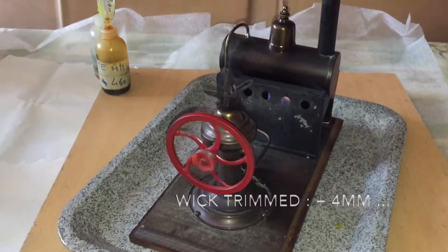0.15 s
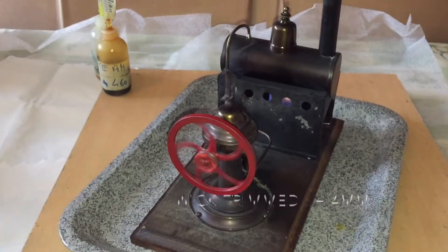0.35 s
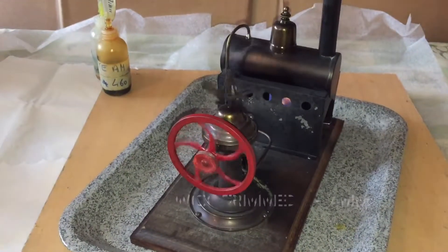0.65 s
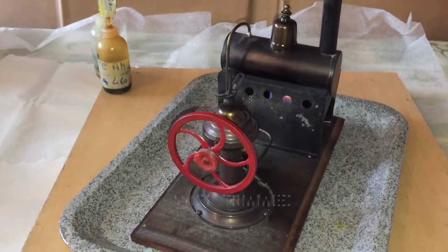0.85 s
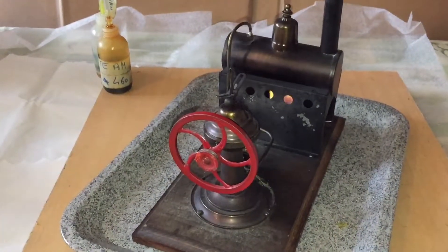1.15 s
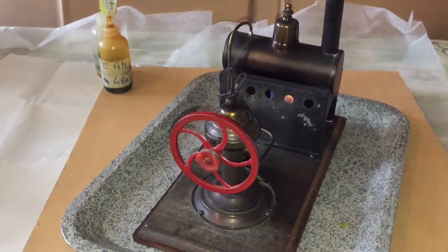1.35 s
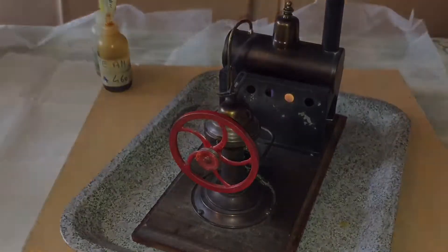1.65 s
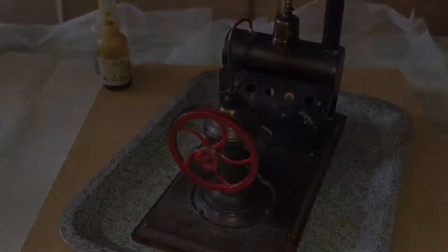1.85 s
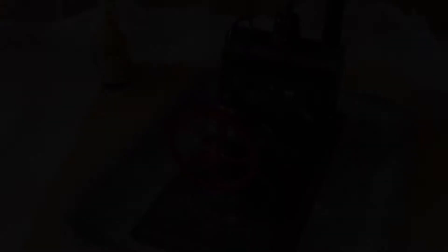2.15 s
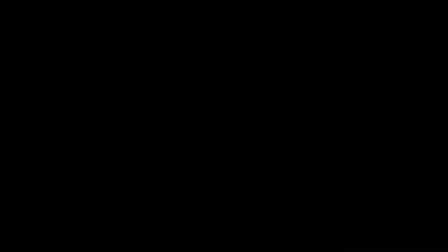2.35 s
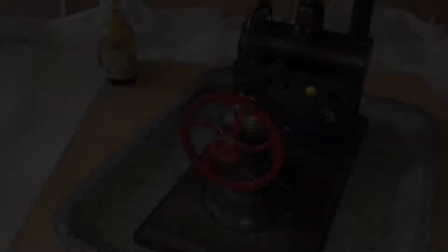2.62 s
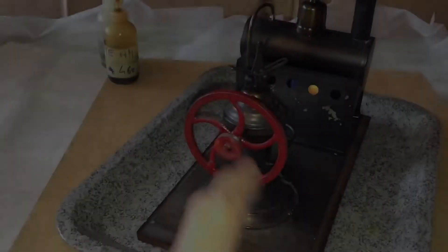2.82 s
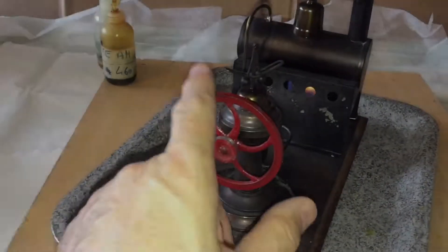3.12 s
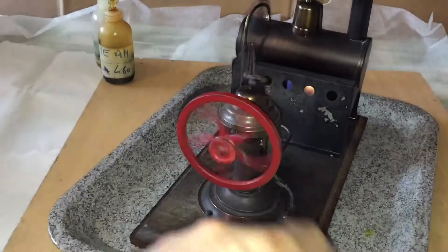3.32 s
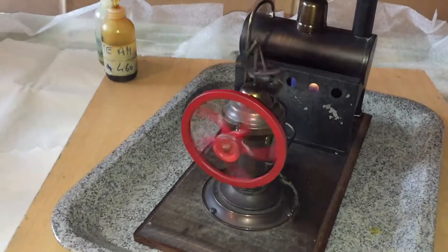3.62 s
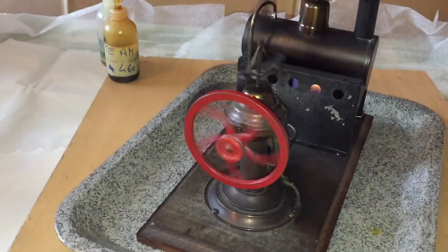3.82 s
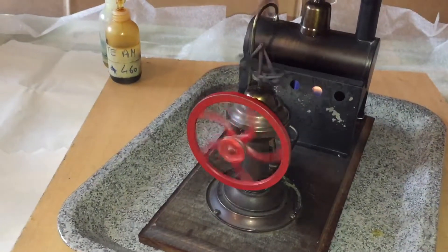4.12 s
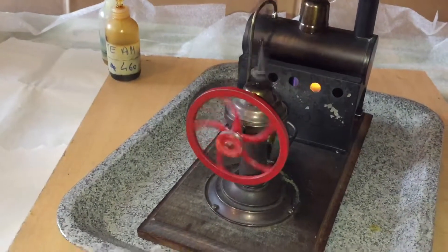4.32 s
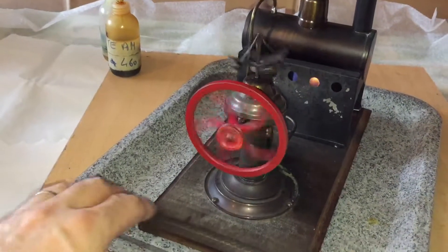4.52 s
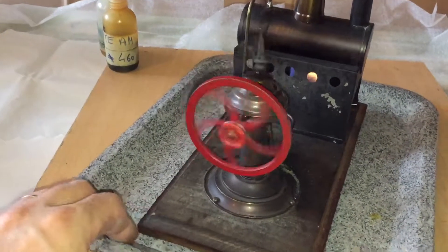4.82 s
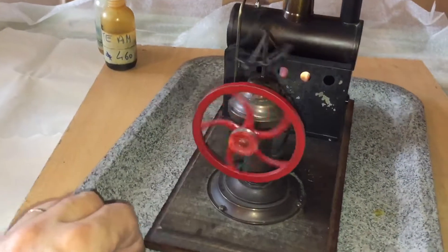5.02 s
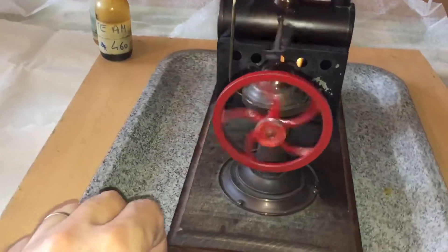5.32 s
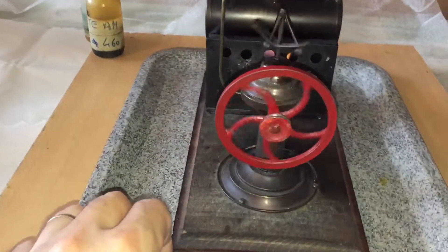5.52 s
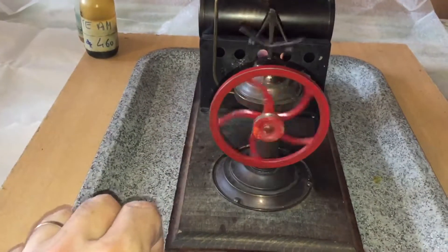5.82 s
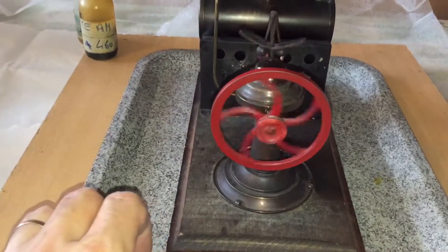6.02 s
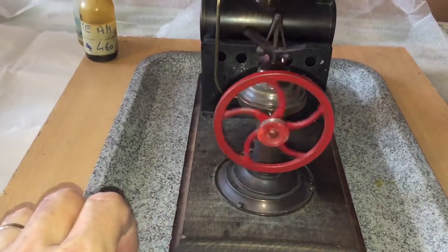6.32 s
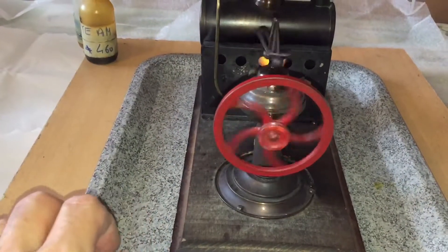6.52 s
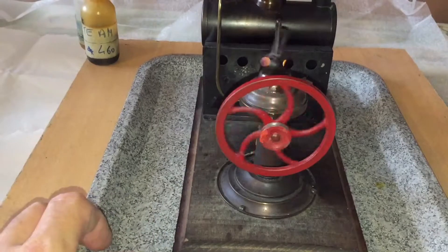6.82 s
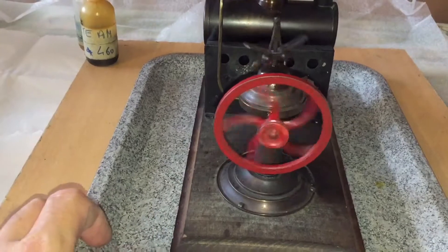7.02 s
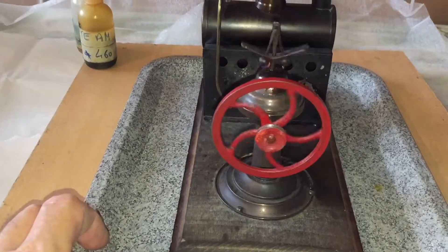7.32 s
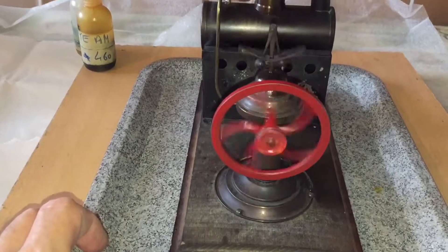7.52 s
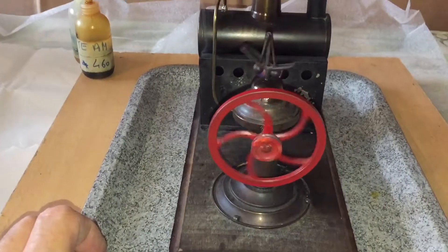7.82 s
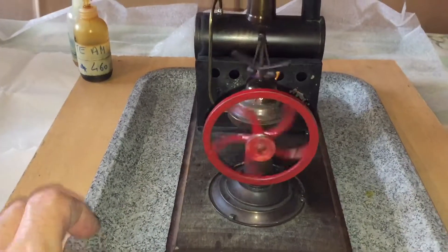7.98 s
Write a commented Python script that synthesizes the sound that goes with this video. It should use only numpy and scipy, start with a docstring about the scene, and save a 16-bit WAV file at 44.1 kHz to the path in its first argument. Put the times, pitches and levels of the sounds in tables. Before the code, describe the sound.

A toy steam engine gives two wet chuffs and stalls hissing amid tray knocks, then restarts and chugs steadily, sputtering and burbling as its tray is scraped round.

```python
"""On a tray on a table in a small room, a toy steam engine gives two strokes and stalls, then runs at two to four turns a second.
Each turn gates a wet sputter (random crackle over hiss) and a hollow burble (pulses ringing the exhaust cavity).
The boiler leaks filtered noise and spits noise bursts; sharp ticks ring briefly; water slugs throb in the exhaust.
The tray knocks and scrapes through its ringing modes as a hand turns it; the table booms, the works and room rumble."""
import sys
import numpy as np
from scipy import signal
from scipy.fft import rfft, irfft
from scipy.io import wavfile
from scipy.ndimage import uniform_filter1d

SR = 44100
rng = np.random.default_rng(int(sys.argv[2]) if len(sys.argv) > 2 else 0)


def transcribe(signal):
    """Save signal, clipped to [-1, 1], as a 16-bit WAV file at the path in sys.argv[1]."""
    frames = np.atleast_2d(signal).T
    limited = np.clip(frames, -1, 1)
    pcm = np.round(limited * 32767).astype(np.int16)
    wavfile.write(sys.argv[1], SR, pcm)


N = 359415
TIME = np.arange(N) / SR
GRID_HZ = np.linspace(0, SR / 2, 4097)

# Power strokes, one a turn. Each row: time of full flow in seconds, exhaust port open in seconds,
# burble level in dB, sputter level in dB.
STROKES = [(0, 0.056, -42.5, -51), (0.536, 0.081, -44, -52.5), (3.405, 0.11, -42.5, -47),
           (3.678, 0.093, -45.5, -49), (3.961, 0.092, -46, -48.5), (4.265, 0.1, -45, -46.5),
           (4.587, 0.11, -45.5, -45.5), (4.946, 0.11, -45, -47.5), (5.324, 0.067, -42.5, -39.5),
           (5.744, .095, -45.5, -42), (6.198, 0.078, -44.5, -43.5), (6.685, 0.055, -42, -46.5),
           (7.14, .087, -44.5, -41.5), (7.598, .084, -44, -45), (8.021, 0.1, -45, -43)]
# Wet steam seeping between strokes. Each row: time in seconds, level in dB ahead of each user's trim.
SEEP = [(0.0, -51), (1.68, -58.5), (1.97, -52), (2.18, -58), (2.45, -55.5), (2.61, -55.5), (3.2, -50.5),
        (3.4, -47.5), (4.24, -52.5), (4.63, -48), (5.58, -50.5), (5.72, -50), (7.31, -50), (8.15, -46.5)]
# Exhaust cavity. Each row: pitch in Hz, half the width in Hz of each of two cascaded resonators, gain in dB.
EXHAUST_MODES = [(702, 78, 7.5), (778, 134, 3.5), (1010, 130, -6.5), (1550, 240, -7)]
# Light knocks on the tray. Each row: start in seconds, rattle level in dB, low edge in Hz,
# rattle t60 in seconds, table boom level in dB ahead of its swell and decay.
KNOCKS = [(1.032, -32.5, 460, 0.0092, -58), (1.516, -46, 260, 0.16, -34), (1.772, -47, 447, 0.38, -65),
          (1.806, -36, 500, 0.2, -39), (1.973, -44, 170, 0.2, -29.5), (2.417, -56.5, 450, 0.21, -43),
          (2.474, -53.5, 130, 0.11, -48), (2.53, -64, 170, 0.13, -45)]


def from_db(db):
    """Decibels to gain."""
    return 10 ** (np.asarray(db) / 20)


def rms_one(x):
    """Scale to unit power."""
    return x / np.sqrt(np.mean(x ** 2) + 1e-20)


def gain_curve(rows):
    """Gain at every sample from rows of (s, dB)."""
    return from_db(np.interp(TIME, *np.transpose(rows)))


def band(x, low_hz, high_hz, order=2):
    """Butterworth band-pass."""
    edges_hz = [low_hz, min(high_hz, SR / 2 - 1)]
    return signal.sosfilt(signal.butter(order, edges_hz, "band", fs=SR, output="sos"), x)


def evened(x, seconds):
    """Hold the running power at one, keeping the finer grain."""
    power = np.abs(uniform_filter1d(x ** 2, max(int(seconds * SR), 2)))
    return x / np.sqrt(power + 1e-14)


def response(points):
    """Gain over frequency from rows of (Hz, dB), interpolated on log frequency."""
    hz, db = np.transpose(points)
    return from_db(np.interp(np.log(GRID_HZ + 1), np.log(hz), db))


def coloured(x, gain):
    """Causal (minimum-phase) filter with the given gain over frequency."""
    cepstrum = irfft(np.log(gain + 1e-6))
    half = len(cepstrum) // 2
    cepstrum[1:half] *= 2  # fold the cepstrum onto positive time
    cepstrum[half + 1:] = 0
    impulse = irfft(np.exp(rfft(cepstrum)))
    return signal.fftconvolve(x, impulse)[:len(x)]


def resonate(x, hz, width_hz):
    """Two-pole resonance with gain about one on top."""
    r = np.exp(-np.pi * width_hz / SR)
    zeros = np.array([1, 0, -1]) * (1 - r * r) / 2
    poles = [1, -2 * r * np.cos(2 * np.pi * hz / SR), r * r]
    return signal.lfilter(zeros, poles, x + 1e-18)


def flicker(per_s, depth_db):
    """Random gain that wanders at the given rate."""
    steps = rng.standard_normal(N // 20)
    return from_db(depth_db * np.interp(TIME * per_s, np.arange(len(steps)), steps))


def grains(per_s, spread_db):
    """Clicks of either sign at random moments, their sizes in dB spread exponentially."""
    sizes = from_db(spread_db * np.minimum(rng.exponential(1, N), 4))
    return (rng.random(N) < per_s / SR) * sizes * rng.choice([-1, 1], N)


def add(out, s, sound):
    """Mix a sound in from the given time, at the earliest from zero."""
    start = max(int(s * SR), 0)
    out[start:start + len(sound)] += sound[:N - start]


def bursts(rows, source, even_s):
    """Each row opens one band of the source, swelling then dying away, for at most 0.6 s."""
    out, t = np.zeros(N), TIME[:SR * 3 // 5]
    for s, db, low_hz, high_hz, rise_s, t60 in rows:
        # equal lead-in lets the filter settle
        piece = np.take(source, int(s * SR) + np.arange(-len(t), len(t)), mode="wrap")
        piece = evened(band(piece, low_hz, high_hz, order=3), even_s)[len(t):]
        decay = from_db(db - 60 * np.maximum(t - rise_s, 0) / t60)
        add(out, s, piece * np.minimum(t / rise_s, 1) * decay)
    return out


def swell(s, hold_s, db, rise_db_per_s, fall_db_per_s):
    """Power of a puff that rises until the given time, holds and falls away."""
    rise_db = rise_db_per_s * np.maximum(s - TIME, 0)
    fall_db = fall_db_per_s * np.maximum(TIME - s - hold_s, 0)
    return from_db(db - rise_db - fall_db) ** 2


def cylinder_puffs(lead_s=0.031, return_s=0.2, return_db=-14):
    """Gain of steam escaping at the cylinder: a puff ahead of each exhaust, a weaker one on the return stroke."""
    power = 0
    for s, _, _, db in STROKES:
        for offset_s, weaker_db in ((-lead_s, 0), (return_s, return_db)):
            power = power + swell(s + offset_s, hold_s=0.016, db=db + weaker_db,
                                  rise_db_per_s=168, fall_db_per_s=142)
    return np.sqrt(power)


def sputter(seep_trim_db=-3, hiss_db=2.5, thin_below_hz=1800, thin_db=-11):
    """Water films burst in the steam: clumped crackle over fluttering hiss, denser and fuller with more steam."""
    # Each row: frequency in Hz, density in dB per Hz.
    wet_colour = [(400, -22), (1100, -6.5), (2200, -4), (3200, 7), (3800, -2.5), (4500, 6), (4950, -1),
                  (5400, 6), (6800, 3), (7700, -1), (8900, 7), (10600, -1), (12400, 6), (15600, -9)]
    seep = gain_curve(SEEP) * from_db(seep_trim_db) * flicker(per_s=28, depth_db=3.0)
    flow = np.hypot(seep, cylinder_puffs())
    crackle = grains(per_s=2500 * np.sqrt(rms_one(flow)), spread_db=3.5)
    crackle = crackle + 0.11 * rng.standard_normal(N)
    crackle = evened(crackle * flicker(per_s=280, depth_db=8.5), seconds=0.0875)
    hiss = rms_one(rng.standard_normal(N) * flicker(per_s=140, depth_db=3.0))
    full = coloured(crackle + from_db(hiss_db) * hiss, response(wet_colour))
    # slow seepage is thinner than the puffs
    thin = coloured(full, response([(thin_below_hz / 2, thin_db), (thin_below_hz, 0)]))
    seeping = (seep / flow) ** 2
    mixed = thin * seeping + full * (1 - seeping)
    return mixed / np.std(band(full, 2700, 7000)) * flow


def exhaust_flow(idle_db=-76):
    """Gain of the exhaust: one swell while the port is open on each turn."""
    puffs = sum(swell(s, open_s, db, rise_db_per_s=236, fall_db_per_s=116) for s, open_s, db, _ in STROKES)
    return np.sqrt(puffs + from_db(idle_db) ** 2)


def exhaust():
    """Steam bubbles through condensate in uneven pulses that ring the exhaust cavity in clumps."""
    pulses = grains(per_s=220, spread_db=1.5) + 0.068 * rng.standard_normal(N)
    cavity = np.zeros(N)
    for hz, half_width_hz, db in EXHAUST_MODES:
        width_hz = 2 * half_width_hz
        cavity += from_db(db) * resonate(resonate(pulses, hz, width_hz), hz, width_hz)
    clumps = evened(cavity, seconds=.03) * flicker(per_s=70, depth_db=3)
    # the small opening radiates little below its resonance
    burble = band(evened(clumps, seconds=0.12), low_hz=538, high_hz=3170, order=5)
    return burble * exhaust_flow()


def glugs(swell_s=0.0075, stop_s=0.0064, throb_hz=95, throb=0.51, spray_db=-14):
    """A slug of water makes the cavity swell into a throbbing note that stops quickly, with a puff of spray."""
    # Each row: time of the crest in seconds (0.05 at the earliest), level of the note's crest in dB.
    slugs = [(.023, -38), (.066, -38), (.157, -43), (.811, -50), (3.528, -28.5), (3.687, -33.5),
             (3.795, -34.5), (4.063, -28.5), (4.299, -26), (5.022, -30), (5.852, -27), (6.225, -34),
             (6.287, -31.5), (6.39, -48), (6.669, -34), (6.912, -40.5), (7.676, -28.5), (8.036, -23),
             (8.106, -30)]
    out, t = np.zeros(N), TIME[:SR // 10] - .05
    for s, db in slugs:
        detune, phase = rng.standard_normal(2)
        note_hz = EXHAUST_MODES[0][0] * (1.01 + 0.021 * detune)
        note = np.sin(2 * np.pi * (note_hz * t + phase))
        spray = rms_one(band(rng.standard_normal(len(t)), low_hz=2200, high_hz=3760))
        envelope = 2 / (np.exp(-t / swell_s) + np.exp(t / stop_s))
        throbbing = (1 + throb * np.cos(2 * np.pi * throb_hz * t)) / (1 + throb)
        add(out, s + t[0], from_db(db) * envelope * throbbing * (note + from_db(spray_db) * spray))
    return out


def leak(turn_start_s=4.7, turn_end_s=5.6, trim_db=-2):
    """A fine jet whose colour changes as the engine is turned to face the listener."""
    # Each row: time in seconds, level above 11 kHz in dB ahead of the trim.
    jet_levels = [(0.0, -56), (0.36, -51), (1.79, -52), (2.0, -52.5), (2.38, -49.5), (2.59, -47),
                  (3.27, -43.5), (3.43, -50), (4.38, -50), (4.72, -48), (4.97, -50.5), (5.92, -44),
                  (6.54, -45.5), (6.86, -46), (7.51, -46), (8.15, -47.5)]
    # Each row: frequency in Hz, density in dB per Hz.
    aside_colour = [(1500, -18), (2500, -51), (3300, -10), (3750, -44), (4450, 0.5), (4950, -24),
                    (5600, 10.5), (6500, 8.5), (7550, -4), (8500, 11), (9700, 9.5), (10600, 7.5),
                    (12200, 14.5), (15600, 14.5)]
    facing_colour = [(1500, -26), (3200, -40), (3800, -7.5), (4600, 3), (4950, 3), (5350, 4), (6200, -24),
                     (7000, 6), (7600, -9), (8800, 8.5), (9800, 7.5), (10600, -7), (12000, 7.5),
                     (15600, 4.5)]
    jet = rng.standard_normal(N) * flicker(per_s=370, depth_db=2.5)
    views = [coloured(jet, response(colour)) for colour in (aside_colour, facing_colour)]
    aside, facing = [view / np.std(band(view, 11000, 15700)) for view in views]
    turned = np.interp(TIME, [turn_start_s, turn_end_s], [0, 1])
    return (aside * (1 - turned) + facing * turned) * gain_curve(jet_levels) * from_db(trim_db)


def spits(rise_s=0.013):
    """Short grainy puffs of steam."""
    # Each row: start in seconds, level in dB, low edge in Hz, high edge in Hz, t60 in seconds.
    spit_rows = [(.31, -43, 1840, 13000, 0.17), (0.523, -42.5, 1400, 8050, 0.12),
                 (.77, -54.5, 1470, 2110, 0.28), (.915, -52, 1700, 3940, 0.26),
                 (1.072, -44, 1590, 4840, 0.21), (1.385, -56, 1680, 2500, 0.2),
                 (1.9, -52, 2000, 8000, 0.14), (2.041, -45, 2280, 8450, 0.28),
                 (2.71, -55.5, 1210, 2600, .1), (2.887, -43, 1130, 4050, 0.25),
                 (3.2, -53, 1330, 6000, 0.34), (3.315, -41.5, 1480, 9000, .16),
                 (5.735, -38.5, 1520, 13000, 0.045), (6.537, -32, 1670, 9400, 0.23),
                 (6.565, -36.5, 835, 10100, 0.22), (7.004, -41, 1550, 6000, 0.2),
                 (7.113, -46, 1100, 4200, 0.3), (7.97, -36, 1230, 8400, 0.16)]
    # Each row: frequency in Hz, density in dB per Hz.
    spit_colour = [(700, 14.2), (1500, 6.3), (2500, 7.2), (6000, 5.9), (7500, 1), (9000, 5.9), (15000, 6.2)]
    steam = rng.standard_normal(N) * flicker(per_s=680, depth_db=5.0)
    puffs = [(s, db, low_hz, high_hz, rise_s, t60) for s, db, low_hz, high_hz, t60 in spit_rows]
    return bursts(puffs, coloured(steam, response(spit_colour)), even_s=0.0066)


def ticks(ring_width_hz=1900, snap_db=-14, snap_s=0.00086):
    """Sharp ticks with a brief ring: drops bursting on hot metal, and the bright edges of a tray hit and a click."""
    # The loudest ticks. Each row: start in seconds, peak in dB, pitch in Hz.
    tick_rows = [(0.1206, -30, 3110), (0.1333, -34, 3130), (0.6905, -34.5, 3270), (0.9217, -31, 2840),
                 (1.0314, -30.5, 4400), (1.2152, -31, 3240), (1.2741, -29.5, 3200), (1.9191, -36, 3130),
                 (4.467, -22.5, 7360), (4.4735, -24, 2510), (4.571, -30, 4930), (5.52, -27, 4500),
                 (5.6505, -27.5, 3140), (5.7, -35, 5340), (6.0294, -26.5, 2800), (6.7266, -27, 3040),
                 (7.4884, -25, 3320)]
    out, t = np.zeros(N), TIME[:SR // 50]
    for s, db, hz in tick_rows:
        snap = rng.choice([-1, 1], len(t)) * np.exp(-t / snap_s)
        ring = resonate(resonate(snap, hz, ring_width_hz), hz, ring_width_hz)
        tick = rms_one(ring) + from_db(snap_db) * rms_one(band(snap, low_hz=398, high_hz=12900))
        add(out, s, from_db(db) * tick / np.abs(tick).max())
    return out


def small_drops(drop_hz=3200, ring_width_hz=1300, trim_db=-12):
    """Lesser drops tick at random, their level following the seeping steam."""
    drops = grains(per_s=70, spread_db=-0.5)
    ring = resonate(resonate(drops, drop_hz, ring_width_hz), drop_hz, ring_width_hz)
    return rms_one(ring) * gain_curve(SEEP) * from_db(trim_db)


def knocks(scrape_high_hz=3400, shudder_lag_s=0.011, shudder_lasts=2.1, crack_db=-10, crack_lasts=0.68):
    """Rattling contacts set tray and table ringing; a shove scrapes first and shudders after."""
    # Each row: pitch in Hz, width in Hz, gain in dB over the broad response.
    tray_modes = [(81, 32, 13), (159, 48, 15.5), (220, 10.4, 13), (277, 18, 5), (335.7, 18, 12.5),
                  (587, 85, -5), (705, 68, 2), (850, 44, -16), (2034, 19, 6), (2270, 100, -16),
                  (2385, 26, 10), (2410, 25, 3), (3240, 290, -42)]
    # Tray shoved over the table. Each row: start in seconds, scrape level in dB, scrape low edge in Hz,
    # shudder level in dB, shudder high edge in Hz, scrape rise in seconds, scrape t60 in seconds.
    shoves = [(.5, -61, 900, -46.5, 260, .008, 0.27), (3.26, -54, 900, -55, 200, .008, .24),
              (4.216, -36.5, 336, -35.5, 364, 0.029, 0.19), (4.464, -27.5, 1650, -33, 1360, 0.012, 0.26),
              (4.92, -46, 365, -64, 500, 0.098, 1), (5.27, -49.5, 320, -63.5, 500, 0.043, 0.76)]
    body = 1 + sum(from_db(db) / (1 + (2 * (GRID_HZ - hz) / width) ** 2) for hz, width, db in tray_modes)
    contacts = rng.standard_normal(N) * flicker(per_s=220, depth_db=2.0)
    rattles = [(s, db, low_hz, 1840, 0.00096, t60) for s, db, low_hz, t60, _ in KNOCKS]
    scrapes, cracks, shudders = [], [], []
    for s, scrape_db, low_hz, shudder_db, high_hz, rise_s, t60 in shoves:
        scrapes.append((s, scrape_db, low_hz, scrape_high_hz, rise_s, t60))
        # the treble of a scrape is weaker and shorter
        cracks.append((s, scrape_db + crack_db, scrape_high_hz, 9000, rise_s, t60 * crack_lasts))
        # the lows swell later and last longer
        shudders.append((s, shudder_db, 68.4, high_hz, rise_s + shudder_lag_s, t60 * shudder_lasts))
    return bursts(rattles + scrapes + cracks + shudders, coloured(contacts, body), even_s=0.024)


def thumps(rise_s=0.025, table_hz=146, boom_delay_s=0.0186, boom_t60_s=0.11):
    """Soft bumps and knocks each swell into one low mode of the table top, which dies away."""
    # Each row: start in seconds, level in dB ahead of swell and decay, pitch in Hz, t60 in seconds.
    bumps = [(0.545, -23, 141, 0.22), (4.31, -38, 148, 0.28), (4.471, -32.5, 88.3, 0.59),
             (4.518, -33, 148.5, 0.35), (4.782, -2, 99.6, 0.036)]
    out, t = np.zeros(N), TIME[:SR // 2]
    booms = [(s + boom_delay_s, db, table_hz, boom_t60_s) for s, _, _, _, db in KNOCKS]
    for s, db, hz, t60 in bumps + booms:
        onset = 1 - np.exp(-(t / rise_s) ** 2)
        add(out, s, np.sin(2 * np.pi * hz * t) * onset * from_db(db - 60 * t / t60))
    return out


def works(follow=0.41, gain_db=-46, clunk_db=-9):
    """Crank and bearings shake the base, with small clunks, a little harder on each power stroke."""
    running = np.interp(TIME, [3.2, 3.4], [.3, 1])
    shake = rms_one(band(rng.standard_normal(N), low_hz=39.0, high_hz=164))
    clunks = rms_one(band(grains(per_s=60, spread_db=5.5), low_hz=169, high_hz=424))
    return from_db(gain_db) * (shake + from_db(clunk_db) * clunks) * running * exhaust_flow() ** follow


def low_rumble():
    """Low rumble of the room and the running works: coloured noise at a slowly moving level."""
    # Each row: frequency in Hz, density in dB per Hz.
    room_colour = [(22, -19), (60, 8), (100, -8), (140, -0.5), (230, -4), (330, -5.5), (450, -6.5),
                   (1100, -7), (2000, -4.5), (5000, -10.5)]
    # Each row: time in seconds, level in dB.
    rumble_levels = [(0, -58.5), (1.4, -59), (3.1, -61.5), (3.5, -57.5), (8.15, -56)]
    return rms_one(coloured(rng.standard_normal(N), response(room_colour))) * gain_curve(rumble_levels)


def nearby(x, echo_db, farthest_s=.007, count=10):
    """Tray, boiler and table throw back early echoes that comb the sound."""
    lags = (rng.uniform(.001, farthest_s, count) * SR).astype(int)
    echoes = sum((-1) ** k * np.pad(x, (lag, 0))[:N] for k, lag in enumerate(lags))
    return x + from_db(echo_db) * echoes / np.sqrt(count)


def room(x, t60=0.089, wet_db=-13):
    """A small room answers with a short, dull tail."""
    t = TIME[:SR // 2]
    tail = band(rng.standard_normal(len(t)), low_hz=100, high_hz=7000)
    tail = tail * from_db(-60 * t / t60) * (t > .003)
    return x + from_db(wet_db) * signal.fftconvolve(x, tail / np.sqrt(np.sum(tail ** 2)))[:N]


def scene():
    """Engine, boiler and tray in the room, over a low rumble."""
    steam = nearby(sputter(), echo_db=-13) + exhaust() + glugs()
    steam = steam + nearby(spits(), echo_db=-0.5) + ticks() + small_drops()
    in_room = room(steam + knocks())
    return (in_room + nearby(leak(), echo_db=-6.5) + thumps() + works() + low_rumble())[None]


def record(dry, dip_s=2.402, dip_width_s=.022, cutoff_hz=15800):
    """The level dips briefly once; the top is cut."""
    dip = from_db(-28 * np.maximum(1 - np.abs(TIME - dip_s) / dip_width_s, 0))
    return signal.sosfilt(signal.ellip(12, .2, 80, cutoff_hz, fs=SR, output="sos"), dry * dip)


dry = scene()
out = record(dry)
transcribe(out)
```